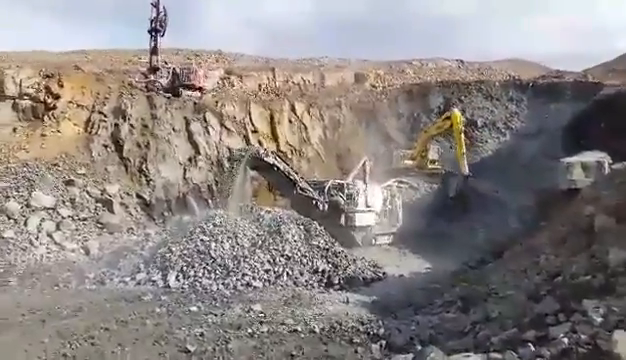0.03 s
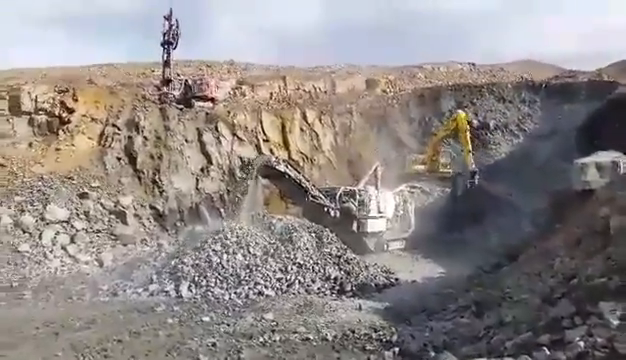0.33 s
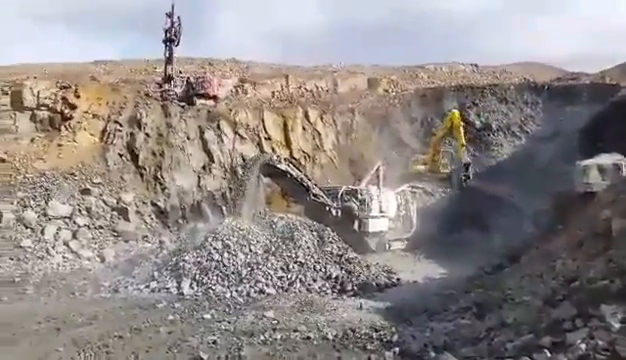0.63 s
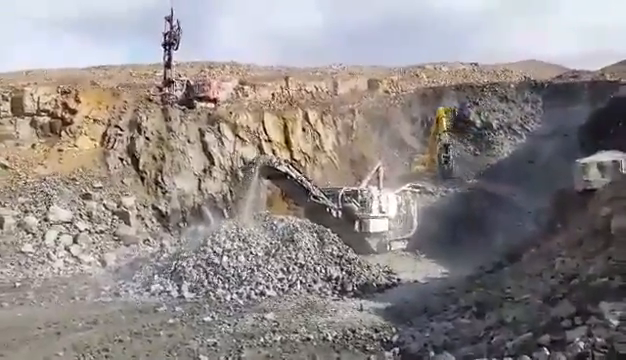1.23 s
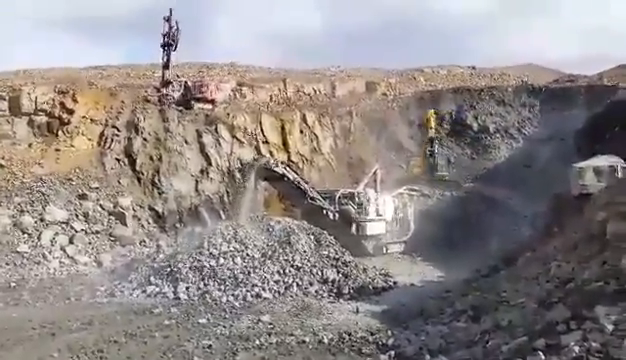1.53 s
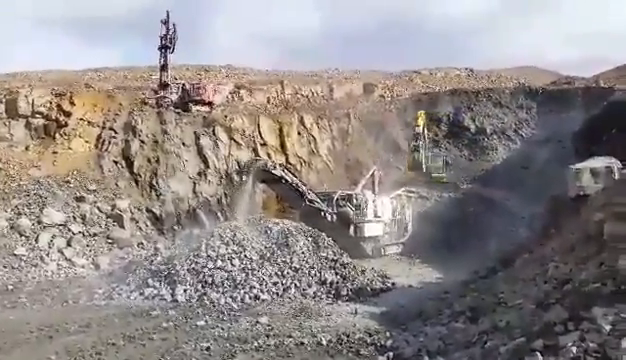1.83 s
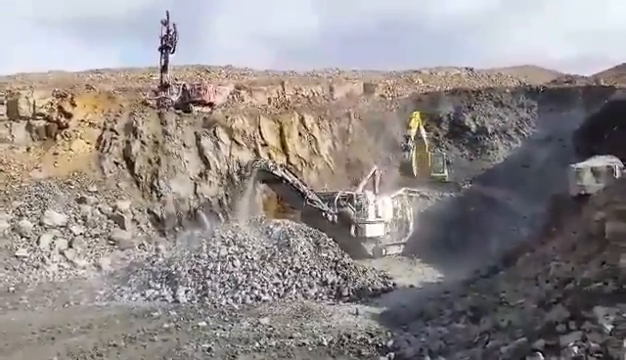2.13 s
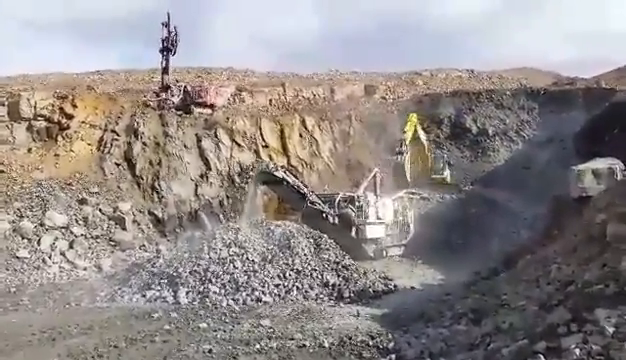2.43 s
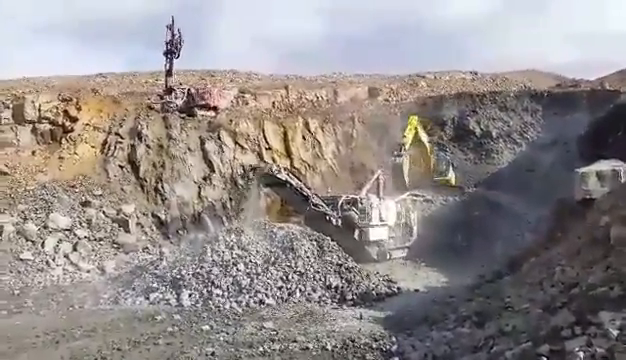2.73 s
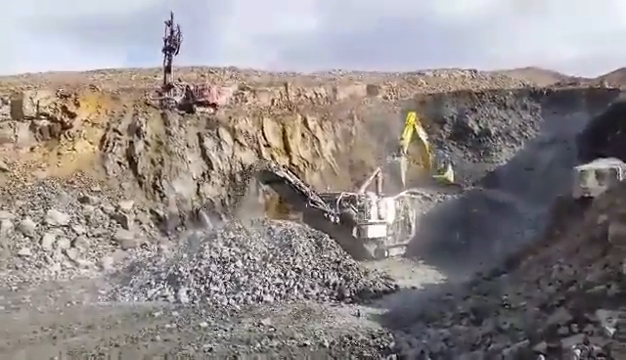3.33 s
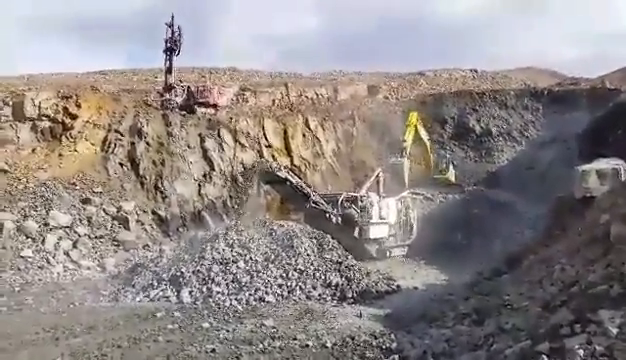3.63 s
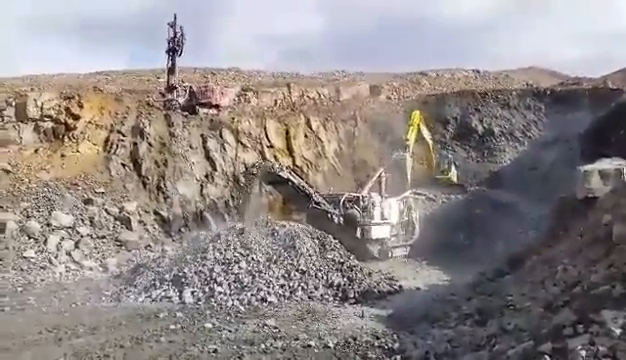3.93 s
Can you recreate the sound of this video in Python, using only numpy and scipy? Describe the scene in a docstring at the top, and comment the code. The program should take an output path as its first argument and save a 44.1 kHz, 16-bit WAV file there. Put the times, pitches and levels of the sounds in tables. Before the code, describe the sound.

A distant rock crusher drones and crunches rock while crushed stone pours off its belt.

```python
"""A mobile rock crusher and an excavator work in an open quarry, heard from a distance.
Diesel engines drone and rumble; rock grinds and knocks in the crusher and booms in its steel hopper.
Crushed stone pours off the belt with scattered clinks, and the quarry face answers."""
import sys
import numpy as np
from scipy import signal
from scipy.fft import rfft, irfft, next_fast_len
from scipy.io import wavfile
from scipy.ndimage import uniform_filter1d, minimum_filter1d, map_coordinates

SR = 44100
rng = np.random.default_rng(int(sys.argv[2]) if len(sys.argv) > 2 else 0)


def transcribe(u):
    """Save the signal u as a 16-bit wav file named by the first command-line argument.

    u: samples, shape (n,) or (channels, n), limited to [-1, 1]; the rate is SR.
    q: integer samples, one column per channel.
    """
    v = np.clip(np.atleast_2d(u).T, -1, 1)
    q = np.round(v * 32767).astype(np.int16)
    wavfile.write(sys.argv[1], SR, q)


N = 176400

# diesel drone (s, level dB)
ENGINE = [(0, -20), (.6, -20), (1.02, -15), (1.17, -20), (1.4, -17.5), (4, -18)]  # fixed
# steady tones of the drives (Hz, dB)
DRIVES = [(162, -31), (333, -35.5), (2592, -55)]  # fixed
RUMBLE = [(14, -42), (27, -18.5), (48, -8), (66, -4.5), (86, 0), (103, -2), (118, -1.5), (140, -8), (170, -4), (195, -11.5), (280, -14), (420, -22)]
# engine load (s, rumble level dB)
LOAD = [(0, -17), (.45, -15), (.8, -18), (1.5, -17.5), (2.15, -14), (3.25, -14.5), (4, -12.5)]
# roar of the screen and the cooling fans (Hz, dB per Hz)
ROAR = [(150, -25), (250, -12), (400, -8), (540, -3), (680, -4), (860, -15.5), (1050, -11.5), (1500, -16.5), (2300, -17.5), (3300, -35)]
ROAR_DB = -25.5
# rock being ground (Hz, dB per Hz)
GRIND = [(120, 3), (250, 7), (400, 1), (640, 4), (870, -5.5), (1050, -2.5), (1450, -7), (2300, -11), (2800, -13.5), (3400, -28.5), (8000, -56)]
# (s, grinding level dB)
FEED = [(0, -23.5), (.45, -24.5), (.7, -34), (1.25, -32.5), (1.5, -22), (1.95, -20.5), (2.4, -21), (2.65, -20), (2.85, -21), (3.25, -17.5), (3.36, -24.5), (3.72, -26.5), (3.86, -18.5), (4, -28)]
# rocks breaking in the jaws (s, dB)
KNOCKS = [(0.319, -29), (.47, -28), (1.436, -28), (1.714, -24.5), (1.925, -34), (2.101, -24.5), (2.295, -25), (2.47, -22.5), (2.599, -19.5), (3.209, -19.5), (3.391, -23), (3.556, -22), (3.93, -23.5)]
KNOCK = [(150, -2), (300, -6), (600, 5.5), (870, 1), (1100, -2.5), (1600, -6.5), (2400, -6), (3400, -22.5), (7000, -31)]
# boulders dropping on the hopper (s, dB)
BOOMS = [(1.44, -25), (2.485, -21), (2.6, -21), (3.275, -18), (3.485, -13), (3.57, -18), (3.665, -19)]  # fixed
HOPPER = [(205.8, 5, 0.22), (242.3, 2.5, 0.16), (282, 9.5, 0.085), (345, -3, 0.22)]  # (Hz, dB, t60 s)
BOOM_RISE_S = .009  # fixed
# boulders landing in the excavator's bucket (s, dB)
THUDS = [(.398, -7), (1.81, -12), (3.105, -10)]  # fixed
THUD_HZ, THUD_T60 = 166, 0.14
# stone pouring off the belt (Hz, dB per Hz)
POUR = [(1500, -22), (3000, 2.5), (3600, -1.5), (4600, 3.5), (6100, -1.5), (7100, -9.5), (8800, -10.5), (10000, -7.5), (10900, -9.5), (11700, -7.5), (12700, -16)]
# (s, level dB)
FLOW = [(0, -38.5), (.28, -39.5), (.41, -41), (1.3, -40.5), (1.95, -38.5), (2.07, -42.5), (2.35, -37), (3.26, -38.5), (3.34, -43.5), (3.65, -42.5), (3.88, -40.5), (4, -46.5)]
# single stones striking (s, peak dB, pitch Hz, t60 s, share of clear ring 0-1)
CLINKS = [(0.063, -23, 4660, 0.05, 0), (.118, -30, 4300, 0.13, 0.15), (0.224, -29.5, 4750, 0.1, 0.4), (0.279, -28.5, 4450, 0.1, 0.2), (0.347, -24, 4470, 0.028, 0.1), (0.504, -31.5, 4510, 0.13, 0.5), (1.098, -24.5, 4680, 0.055, 0.5), (1.177, -32.5, 5870, 0.074, .7), (1.282, -28.5, 5730, 0.029, 0.9), (1.397, -26, 4500, .04, 0), (1.574, -26, 4350, 0.037, 0.4), (1.7472, -13, 4940, 0.025, 0.83), (1.913, -30, 5600, 0.071, .1), (2.262, -25, 6130, 0.02, 0.8), (3.789, -30, 4370, 0.035, .1)]
# sharp ticks of grit (s, peak dB)
TICKS = [(.05, -27), (.741, -31), (.944, -28), (1.763, -28), (2.157, -29), (2.668, -28), (2.839, -21), (2.876, -22), (3.386, -27.5)]
GRIT = [(2000, -25), (4500, -14), (6300, 7), (7500, -14), (9300, -2), (10100, 6.5), (10900, -11), (11700, 9), (12800, -7)]  # (Hz, dB per Hz)
FACE = [(200, 0.99), (2000, 0.26), (10000, 0.083)]  # echo off the quarry face (Hz, t60 s)
FACE_DB = -8.5
CEILING, LIMIT_S = .69, .02  # fixed
TOP_HZ = 12800  # fixed
# firing rate, depth of its throb, unsteadiness of its speed (share)
FIRING_HZ, SURGE_DB, SPEED_DRIFT = 103.4, 1.7, .009  # fixed
TICK_RISE_S, TICK_T60 = 0.0013, 0.044
CLACK_WIDTH, CLINK_RISE_S = .13, .0012  # fixed
CLINK_WIDTH = None
CRACK_DB = -42  # bright crunch of each contact
CRACK_GROWS = None
KNOCK_RISE_S = 0.009  # fixed
KNOCK_HOLD_S, KNOCK_T60 = 0.015, 0.24


def amp(db):
    """Decibels to gain."""
    return 10 ** (np.asarray(db) / 20)


def unit(x):
    """Scale to rms 1."""
    return x / np.sqrt(np.mean(x ** 2) + 1e-20)


def along(points, hz):
    """Read (Hz, value) points on a log axis."""
    f, v = np.transpose(points)
    return np.interp(np.log(hz + 1), np.log(f + 1), v)


def curves(rows):
    """One value per sample for each column after the time."""
    s, *cols = np.transpose(rows)
    return [np.interp(np.arange(N) / SR, s, c) for c in cols]


def wobble(rate):
    """A smooth random curve, rate knots a second."""
    return map_coordinates(rng.standard_normal(2048), [np.arange(N) * rate / SR], mode="wrap")


def filtered(x, response):
    """x times a response of frequency."""
    m = next_fast_len(N + SR // 2)
    return irfft(rfft(x, m) * response(np.fft.rfftfreq(m, 1 / SR)), m)[:N]


def coloured(x, spectrum):
    """x given a spectrum that falls away past its last point, at rms 1."""
    top = spectrum[-1][0]
    return unit(filtered(x, lambda hz: amp(along(spectrum, hz)) / (1 + (hz / (1.2 * top)) ** 8)))  # fixed


def grains(per_s, spread_db):
    """Countless small impacts of uneven size, at rms 1."""
    hit = rng.random(N) < per_s / SR
    return unit(hit * rng.choice([-1, 1], N) * amp(spread_db * np.clip(rng.standard_normal(N), -2, 2)))


def strike(s, rise, hold, t60):
    """Envelope of a blow at time s: attack, hold, release."""
    t = np.arange(N) / SR - s
    return np.clip(t / rise, 0, 1) * amp(-60 * np.clip((t - rise - hold) / t60, 0, 2))


def engines():
    """The throbbing firing tone, the steady drives and an exhaust rumble that grows with load."""
    db, = curves(ENGINE)
    turns = np.cumsum(FIRING_HZ * (1 + SPEED_DRIFT * wobble(29))) / SR
    drone = amp(db) * unit(amp(SURGE_DB * wobble(27.7)) * np.sin(2 * np.pi * turns))
    t = np.arange(N) / SR
    drives = sum(amp(level) * unit(amp(2.4 * wobble(4.11)) * np.sin(2 * np.pi * f * t + .5 * wobble(12))) for f, level in DRIVES)
    load_db, = curves(LOAD)
    return drone + drives + amp(load_db) * coloured(rng.standard_normal(N), RUMBLE)


def crusher():
    """A steady roar, with crunching and clanking that follow the feed of rock."""
    feed_db, = curves(FEED)
    roar = amp(ROAR_DB + 0.38 * wobble(20.53)) * coloured(rng.standard_normal(N), ROAR)
    rock = grains(per_s=2200, spread_db=4.5) + 0.2 * tumble(count=520, lo_hz=421.2, hi_hz=2994, t60=0.22)
    return roar + amp(feed_db + 0.21 * wobble(16)) * coloured(rock, GRIND)


def knocks():
    """Each breaking rock is a short burst of fractures."""
    level = sum(amp(db) * strike(s, KNOCK_RISE_S, KNOCK_HOLD_S, KNOCK_T60) for s, db in KNOCKS)
    return level * coloured(grains(per_s=2500, spread_db=3), KNOCK)


def hopper():
    """Boulders ring the low modes of the steel hopper, a little differently wherever they land."""
    out, t = np.zeros(N + SR), np.arange(SR // 2) / SR
    for s, db in BOOMS:
        for hz, level, t60 in HOPPER:
            ring = np.sin(2 * np.pi * hz * (1 + 0.03 * rng.normal()) * t + rng.normal())
            out[round(s * SR):][:len(t)] += amp(db + level - 60 * t / t60) * ring * (1 - np.exp(-t / BOOM_RISE_S))
    return out[:N]


def pour():
    """Crushed stone streams onto the heap, with small pebbles clicking in it."""
    flow_db, = curves(FLOW)
    stream = rng.standard_normal(N) + 0.51 * grains(per_s=420, spread_db=3) + 0.11 * tumble(count=260, lo_hz=4070, hi_hz=6830, t60=0.012)
    return amp(flow_db + 1.52 * wobble(40)) * coloured(stream, POUR)


def clinks():
    """A stone cracks and rattles in a broad band around its pitch; a clean hit rings more than it clacks."""
    out, t = np.zeros(N + SR), np.arange(SR // 4) / SR
    f = np.fft.rfftfreq(len(t), 1 / SR)
    crunch = coloured(rng.standard_normal(N), GRIT)
    for s, db, hz, t60, share in CLINKS:
        band = 1 / (1 + ((f - hz) / (CLACK_WIDTH * hz)) ** 2)
        clack = unit(irfft(rfft(rng.standard_normal(len(t))) * band, len(t)))
        ring, share = unit(np.sin(2 * np.pi * hz * t)), np.clip(share, 0, 1)
        stone = np.sqrt(share) * ring + np.sqrt(1 - share) * clack
        crack = amp(CRACK_DB) * np.roll(crunch, round(s * SR))[:len(t)]
        out[round(s * SR):][:len(t)] += amp(-60 * t / t60) * (1 - np.exp(-t / CLINK_RISE_S)) * (amp(db) * stone + crack)
    return out[:N]


def ticks():
    """Small grit snaps, dry and bright."""
    level = sum(amp(db - 10) * strike(s, TICK_RISE_S, 0, TICK_T60) for s, db in TICKS)
    return level * coloured(rng.standard_normal(N), GRIT)


def quarry_face(x):
    """A diffuse echo whose treble dies first."""
    hz, t, z = signal.stft(rng.standard_normal(SR // 2), SR, nperseg=256)
    tail = signal.istft(z * amp(-60 * t / along(FACE, hz)[:, None]), SR, nperseg=256)[1]
    return signal.fftconvolve(x, tail / np.linalg.norm(tail))[:N]


def tumble(count, lo_hz, hi_hz, t60):
    """Stones collide at random, each ringing briefly at its own pitch; rms 1."""
    when, pitch, size, phase = rng.random((count, 4)).T[:, :, None]
    t = np.arange(SR // 10) / SR
    rings = amp(10 * size - 60 * t / t60) * np.sin(2 * np.pi * (lo_hz * (hi_hz / lo_hz) ** pitch * t + phase)) * (1 - np.exp(-t / CLINK_RISE_S))
    at = (when * N).astype(int) + np.arange(len(t))
    return unit(np.bincount(at.ravel(), rings.ravel())[:N])


def bucket():
    """Boulders land in the excavator's bucket with a dull, quickly dying thud."""
    t = np.arange(N) / SR
    return sum(amp(db) * strike(s, BOOM_RISE_S, 0, THUD_T60) * np.sin(2 * np.pi * THUD_HZ * (t - s)) for s, db in THUDS)


def scene():
    """The machines and their echo; the nearer stones sound dry."""
    blows = knocks() + hopper() + bucket()
    return (engines() + crusher() + pour() + ticks() + clinks() + blows + amp(FACE_DB) * quarry_face(blows))[None]


def record(dry):
    """A fast limiter holds the peaks; nothing is kept above the band limit."""
    size = int(LIMIT_S * SR)
    needed = np.minimum(1, CEILING / (np.abs(dry[0]) + 1e-9))
    gain = uniform_filter1d(minimum_filter1d(needed, size), size)
    return filtered(dry[0] * gain, lambda hz: 1 / np.sqrt(1 + (hz / TOP_HZ) ** 200))[None]  # fixed


dry = scene()
out = record(dry)
transcribe(out)
```